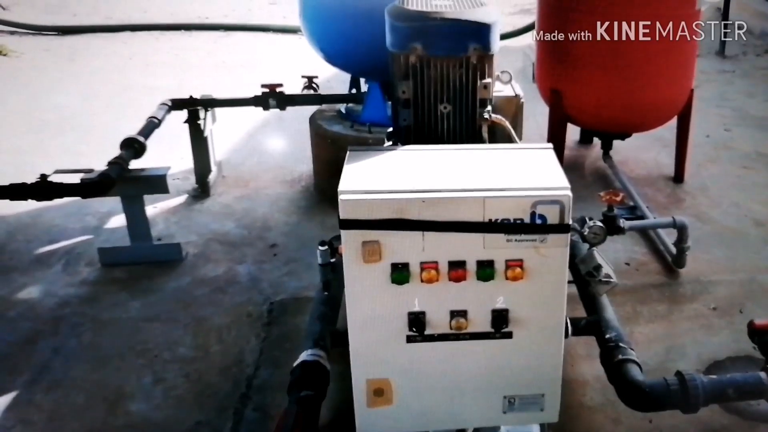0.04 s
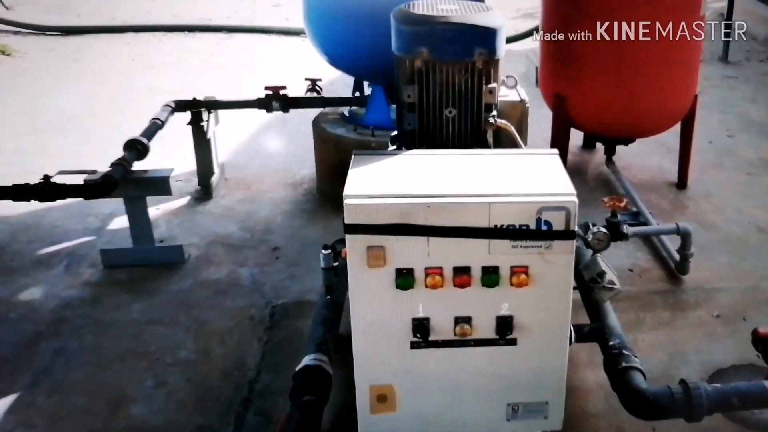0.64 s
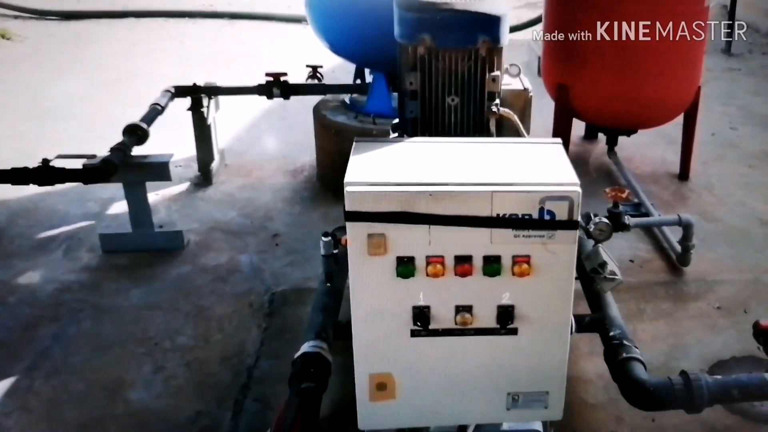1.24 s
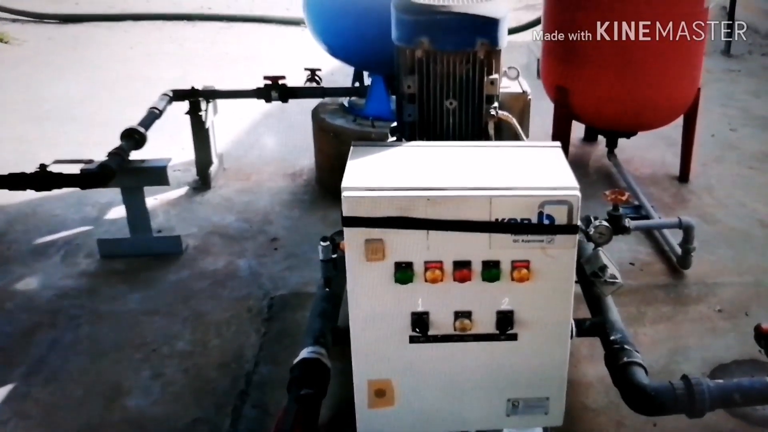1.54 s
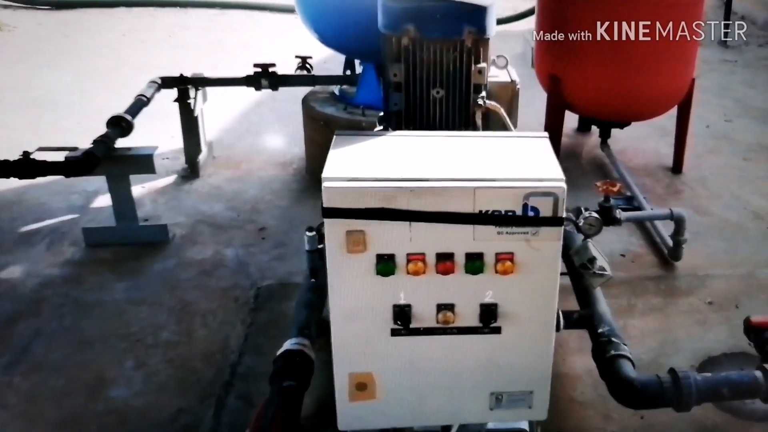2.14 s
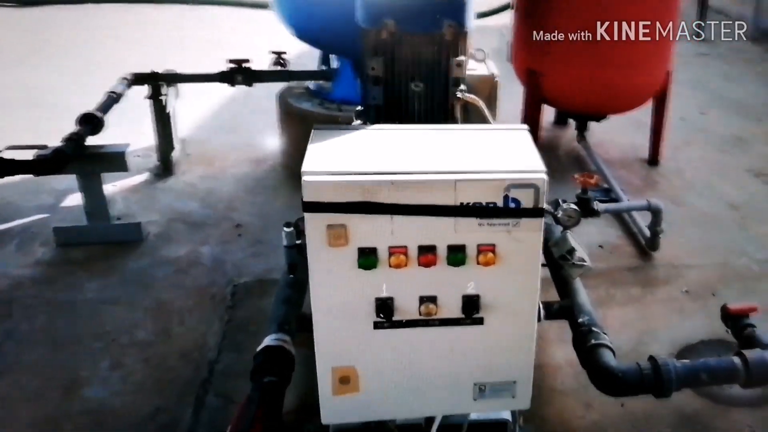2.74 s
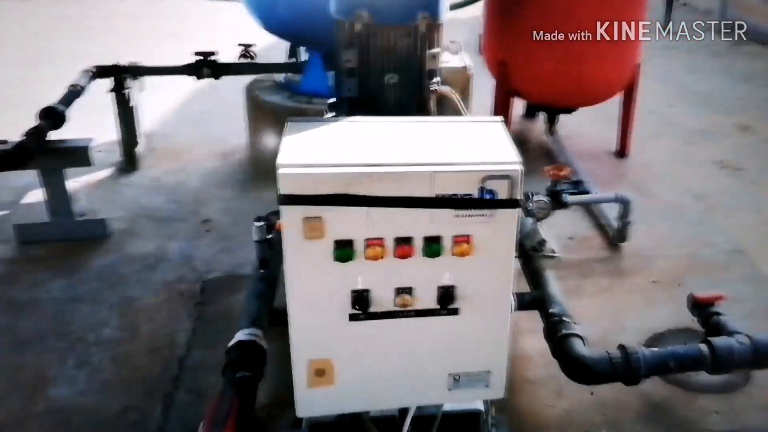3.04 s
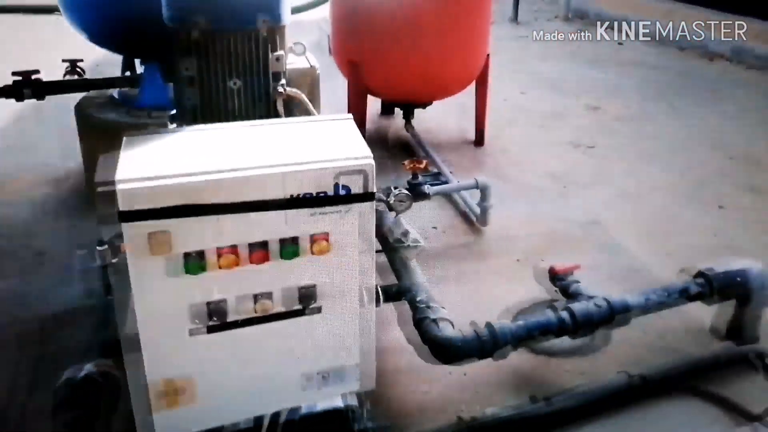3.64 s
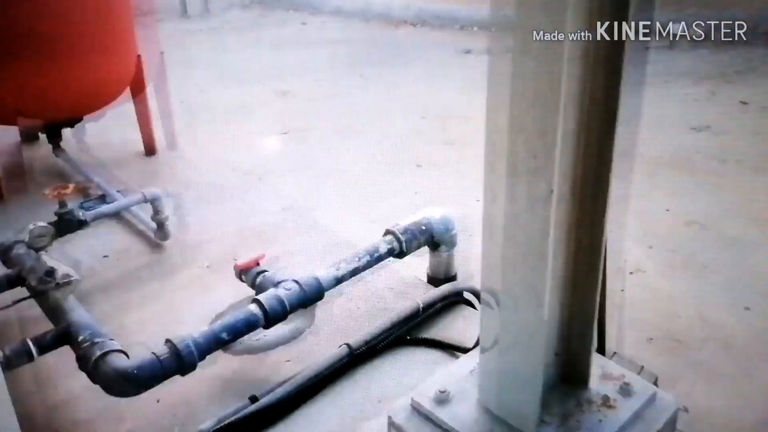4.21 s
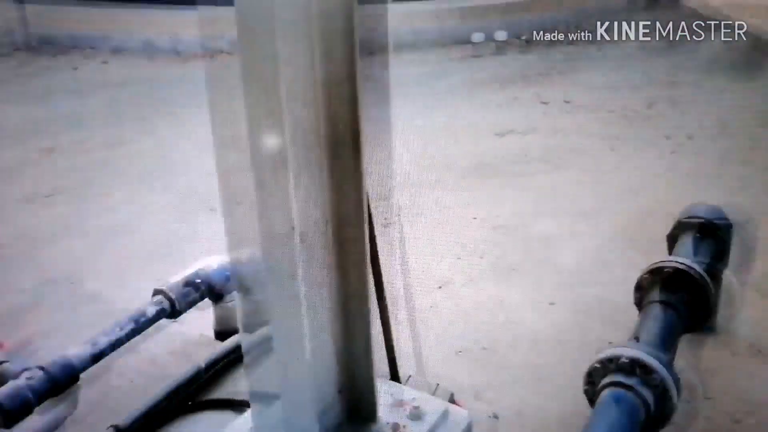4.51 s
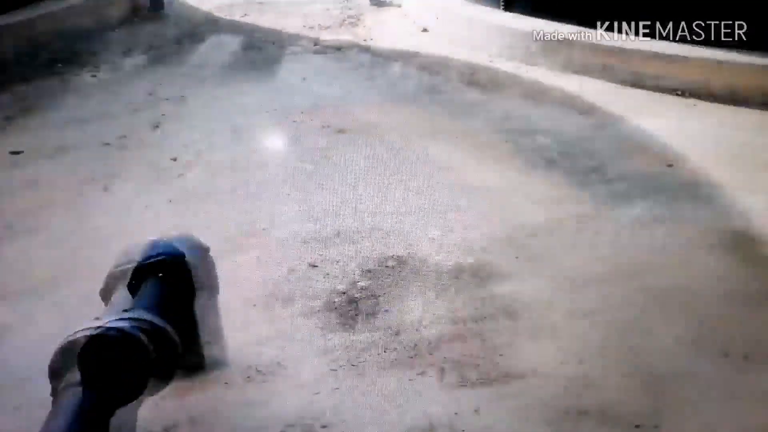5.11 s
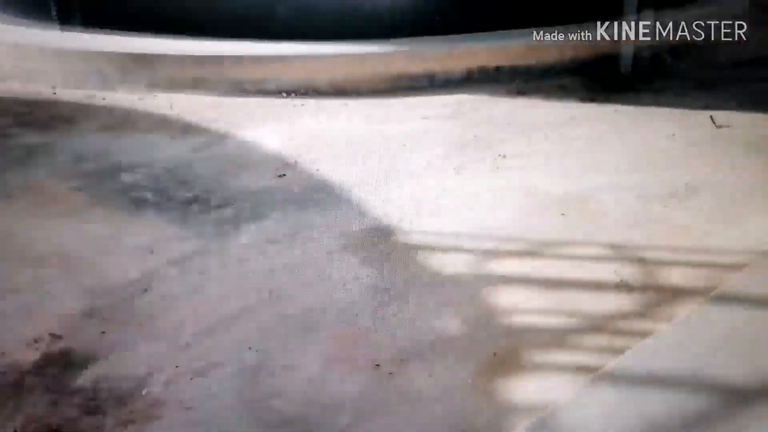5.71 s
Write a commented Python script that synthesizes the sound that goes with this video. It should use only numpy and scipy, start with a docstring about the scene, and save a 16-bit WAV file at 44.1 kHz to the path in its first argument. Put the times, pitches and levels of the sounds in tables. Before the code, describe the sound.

In a concrete pump room, an electric water pump runs steadily with a high, hissing whine. Beneath it are the airy rush of its cooling fan, faint tones, a low hum and rumbling pipes. A second pump's faint hum slowly rises as it spins up, and a few soft, dull knocks occur. The hand-held stereo microphone sways and turns away near the end, slightly softening the sound.

```python
"""In a concrete pump room, one electric water pump runs steadily while a second slowly spins up.
The drive's random switching forces the motor frame into resonance: a high, hissing whine. Under it are
the turbulent rush of the cooling fan, faint impeller tones, mains hum, rumbling pipes and a few dull
knocks. The hand-held stereo microphone sways a little and turns away at the end."""
import sys
import numpy as np
from scipy import signal
from scipy.fft import rfft, irfft
from scipy.io import wavfile
from scipy.ndimage import map_coordinates

SR = 44100
rng = np.random.default_rng(int(sys.argv[2]) if len(sys.argv) > 2 else 0)


def wrap_up_sound(samples):
    """Save the sound to the file named by the first command line argument, as 16-bit audio."""
    columns = np.atleast_2d(samples).T
    # keep every value between -1 and 1, then stretch to whole-number steps
    tamed = np.clip(columns, -1, 1)
    steps = np.round(tamed * 32767).astype(np.int16)
    wavfile.write(sys.argv[1], SR, steps)


N = 254060
TIME, FREQ = np.arange(N) / SR, np.maximum(np.arange(N // 2 + 1) * SR / N, 1)


def undb(db):
    """Amplitude ratio of a level in decibels."""
    return 10 ** (np.asarray(db) / 20)


def swing(db):
    """Amplitude modulation by a level curve taken about its mean."""
    return undb(db - db.mean())


def pan(db):
    """Port gains for a level difference, left minus right."""
    return undb(np.array([[.5], [-.5]]) * db)


def envelope(table):
    """Spectral envelope: a gain curve for each level column, with a steep roll-off past both ends."""
    hz, *columns = np.transpose(table)
    roll_off = np.minimum(1, np.minimum(FREQ / hz[0], hz[-1] / FREQ)) ** 12
    return roll_off * np.array([undb(np.interp(np.log(FREQ), np.log(hz), db)) for db in columns])


def noise(channels=1):
    """White noise of unit power per Hz."""
    return rng.standard_normal((channels, N)) * np.sqrt(SR / 2)


def walk(rate, size=8192):
    """Low-pass Gaussian fluctuation of unit variance, with a bandwidth of about rate Hz."""
    hz = np.arange(size // 2 + 1) * SR / N
    drift = irfft(rfft(rng.standard_normal(size)) * np.exp(-(hz / rate) ** 2))
    return np.interp(np.arange(N) * size / N, np.arange(size), drift / drift.std())


def tones(hz, orders, waver_db, waver_rate):
    """Harmonic series on a fundamental, each partial wavering in level independently."""
    phase = 2 * np.pi * np.cumsum(hz) / SR
    return sum(np.sqrt(2) * undb(db + waver_db * walk(waver_rate))
               * np.sin(k * phase + 2 * np.pi * rng.random()) for k, db in orders)


def resonances(peaks, force, swell_db, swell_rate, lags_ms):
    """Superposition: the stereo spectrum of narrow ringing peaks, each driven by its own noise."""
    spectrum = 0
    for hz, width, left_db, right_db in peaks:
        response = 1 / (1 + 2j * (FREQ - hz) / width) ** 2
        lag_s = rng.uniform(*lags_ms) / 1000  # each peak arrives from its own direction
        ports = undb([[left_db], [right_db]]) * np.exp(-2j * np.pi * hz * np.array([[0], [lag_s]]))
        excitation = noise() * force * swing(swell_db * walk(swell_rate))
        spectrum = spectrum + ports * response * rfft(excitation)
    return spectrum


def room(spectrum, wet=0.58, t60=0.35, lag_ms=0.028, drift_rate=0.5):
    """Direct sound plus a diffuse field, whose interference pattern shifts as the hand moves."""
    echoes = rng.standard_normal((2, 2, N)) * np.exp(-np.log(1000) * TIME / t60)
    echoes /= np.sqrt(np.sum(echoes ** 2, axis=-1, keepdims=True))
    here, there = irfft(spectrum * rfft(echoes), N)
    place = walk(drift_rate)
    diffuse = rfft(np.cos(place) * here + np.sin(place) * there)
    direct = spectrum * np.exp(-2j * np.pi * FREQ * np.array([[0], [lag_ms / 1000]]))
    return np.sqrt(1 - wet) * direct + np.sqrt(wet) * diffuse


def turned(start_s, length_s):
    """Raised-cosine progress of the microphone's turn: 0 facing the pump, 1 facing away."""
    progress = np.clip((TIME - start_s) / length_s, 0, 1)
    return .5 - .5 * np.cos(np.pi * progress)


def pickup(away_db, sway_db, sway_rate=8.3):
    """Directivity: a source's gain sways at random and falls as the microphone turns away."""
    return swing(away_db * turned(start_s=3.3, length_s=1.8) + sway_db * walk(sway_rate))


def shifted(ports, lag_ms, pan_db=0):
    """Path difference and shadowing: in mid-turn the left port lags and the balance moves by pan_db."""
    shift = turned(start_s=3.5, length_s=1.3)
    left = map_coordinates(ports[0], [(TIME - shift * lag_ms / 1000) * SR], mode="mirror")
    return np.array([left, ports[1]]) * pan(pan_db * (shift - shift.mean()))


# Broad response of the motor frame: f/Hz, left spectrum level/dB, right spectrum level/dB
FRAME_SPECTRUM = [(3300, -100, -100), (3840, -89, -80.5), (4330, -78.5, -74.5), (4620, -90, -74.5),
                  (5000, -79, -64), (5350, -78.5, -69.5), (5700, -77, -69), (6020, -75, -66),
                  (6240, -66, -60.0), (6730, -70, -64), (7200, -73, -68), (7560, -70.5, -71.5),
                  (8200, -66, -77), (8500, -61.5, -75), (8900, -76, -71.5), (9370, -70, -75),
                  (10200, -74.5, -86.5), (11340, -79, -79), (12270, -86, -81), (12700, -94, -96),
                  (13900, -101, -100), (15400, -100, -90.5)]
# Narrow ringing peaks in the high whine: f/Hz, bandwidth/Hz, left level/dB, right level/dB
WHINE_PEAKS = [(4983, 8, -90.0, -63.5), (5133, 8, -82.0, -62.0), (5278, 22, -77.5, -62.5),
               (5528, 25, -81.5, -63.0), (5683, 70, -81.5, -60.5), (5765, 44, -79.5, -59.0),
               (5839, 70, -72.5, -54.5), (5925, 51, -84.0, -55.0), (6008, 46, -72.5, -49.0),
               (6044, 29, -64.5, -62.0), (6099, 18, -74.0, -52.5), (6136, 70, -82.0, -54.5),
               (6173, 22, -63.5, -48.5), (6244, 33, -70.0, -48.0), (6272, 33, -67.0, -48.5),
               (6336, 65, -63.0, -45.5), (6401, 16, -66.5, -50.5), (6431, 29, -61.5, -48.0),
               (6461, 15, -65.5, -47.0), (6503, 31, -74.0, -45.0), (6536, 27, -58.0, -51.5),
               (6578, 35, -68.5, -49.0), (6644, 21, -71.0, -49.5), (6723, 12, -71.5, -48.5),
               (6757, 60, -68.0, -56.0), (6818, 26, -77.0, -55.0), (6875, 15, -73.5, -55.0),
               (6935, 61, -65.0, -60.0), (7020, 23, -75.5, -56.0), (7159, 70, -72.0, -63.5),
               (7238, 38, -69.0, -65.5), (7353, 22, -68.0, -67.5), (7884, 22, -59.5, -71.5),
               (8019, 23, -60.5, -84.0), (8101, 70, -61.5, -79.0), (8209, 40, -63.5, -72.5),
               (8283, 46, -58.5, -69.0), (8349, 70, -59.0, -69.5), (8421, 42, -57.0, -67.0),
               (8455, 25, -61.0, -70.5), (8511, 62, -55.5, -68.0), (8563, 30, -59.0, -66.0),
               (8636, 48, -54.0, -68.5), (8717, 26, -53.5, -72.0), (8767, 35, -54.5, -70.5),
               (8861, 64, -59.5, -72.5), (8929, 70, -64.0, -74.5), (9003, 70, -63.5, -75.5),
               (9109, 35, -62.0, -86.0), (9186, 23, -61.5, -79.0), (9380, 17, -64.5, -73.5)]


def motor_whine(flutter_db=0.56, throb_depth=0.057, throb_hz=75, split_hz=7450):
    """Forced vibration: irregular switching shakes the frame in two broad humps; narrow peaks ring."""
    throb = 1 + throb_depth * np.sin(2 * np.pi * throb_hz * TIME)
    force = undb(flutter_db * walk(51)) * throb
    broad = envelope(FRAME_SPECTRUM) * room(rfft(noise() * force))
    spectrum = broad + resonances(WHINE_PEAKS, force, swell_db=0.5, swell_rate=2.4, lags_ms=(-.05, .15))
    # the humps radiate in different directions, so each swells on its own as the microphone moves
    low_pass = 1 / (1 + (FREQ / split_hz) ** 30)
    low_hump = irfft(spectrum * low_pass, N) * pickup(away_db=-1.5, sway_db=0.62, sway_rate=30)
    high_hump = irfft(spectrum * (1 - low_pass), N) * pickup(away_db=-0.5, sway_db=0.76)
    return low_hump + high_hump


# Broad airy rush, with a slight dip near 3.2 kHz and a lift near 3.5 kHz:
# f/Hz, left spectrum level/dB, right spectrum level/dB
RUSH_SPECTRUM = [(99, -105, -105), (298, -93, -92), (434, -88.5, -88), (567, -84, -83.5),
                 (708, -80.5, -81.5), (870, -79.5, -72.5), (1090, -73, -75.5), (1200, -88, -77.5),
                 (1480, -82.5, -77.5), (1910, -78, -77.5), (2500, -80.5, -77.5), (2800, -83, -79.5),
                 (3200, -84.5, -83.5), (3550, -80.5, -80), (3950, -95, -89.5), (5150, -105, -105)]
# Modes of the fan cowl: f/Hz, bandwidth/Hz, left relative level/dB, right relative level/dB
COWL_MODES = [(535, 36, -84.0, -82.5), (670, 29, -81.5, -80.0), (792, 17, -76.5, -78.0),
              (831, 37, -73.0, -74.5), (858, 19, -72.0, -73.0), (886, 9, -73.5, -70.5),
              (913, 33, -70.0, -69.0), (937, 16, -71.5, -73.0), (1072, 58, -73.0, -68.5),
              (1104, 23, -75.0, -69.5), (1119, 15, -69.0, -68.0), (1171, 8, -77.0, -70.5),
              (1365, 13, -76.0, -70.5), (1394, 40, -85.0, -72.0), (1446, 61, -77.0, -73.5),
              (1559, 31, -75.5, -75.0), (1645, 14, -74.0, -68.5), (1684, 39, -78.5, -78.0),
              (1772, 42, -76.5, -75.0), (1912, 39, -81.5, -73.0), (1999, 52, -78.0, -74.5),
              (2269, 32, -84.0, -74.0), (2421, 24, -88.0, -74.0), (2538, 43, -79.5, -81.0)]


def cooling_fan(coherent_below_hz=1100, flutter_db=1.0, cowl_db=0.7):
    """Turbulence radiates broadband noise, coherent between the ports in the bass, and rings the cowl."""
    force = undb(flutter_db * walk(24))
    coherence = 1 / (1 + (FREQ / coherent_below_hz) ** 4)
    air = np.sqrt(coherence) * rfft(noise()) + np.sqrt(1 - coherence) * rfft(noise(channels=2))
    rush = irfft(air * envelope(RUSH_SPECTRUM), N) * force
    modes = resonances(COWL_MODES, force, swell_db=0.8, swell_rate=0.73, lags_ms=(-.08, .02))
    cowl = undb(cowl_db) * irfft(modes, N)
    return (shifted(rush, lag_ms=0.13) * pickup(away_db=-1.5, sway_db=0.8)
            + shifted(cowl, lag_ms=0.27, pan_db=-9) * pickup(away_db=-1.8, sway_db=-0.15))


# Tones of the running pump, whose six vanes give the multiples of 6: shaft order, level/dB
IMPELLER_ORDERS = [(3, -78), (18, -60), (36, -68)]
# Tone at twice the vane-passing rate: shaft order, level/dB before it swells
SWELLING_ORDERS = [(12, -70)]


def impeller(shaft_hz=59.45, swell_s=4.35, swell_width_s=0.25, swell_db=8):
    """Periodic forcing gives harmonics of the shaft rate; one swells briefly during the turn."""
    hz = shaft_hz * (1 + 0.00048 * walk(5.4))
    swell = undb(swell_db * np.exp(-((TIME - swell_s) / swell_width_s) ** 2))
    steady = tones(hz, IMPELLER_ORDERS, waver_db=2.0, waver_rate=4.6)
    swelling = swell * tones(hz, SWELLING_ORDERS, waver_db=2.0, waver_rate=4.6)
    return (steady + swelling) * pickup(away_db=-2.5, sway_db=1.5) * pan(1)


def hum(mains_hz=60, magnetic_db=-64, deep_hz=57.9, deep_db=-64.5):
    """Magnetic force pulses at twice the mains frequency; a steady deep tone lies below it."""
    magnetic = tones(np.full(N, mains_hz), [(2, magnetic_db)], waver_db=1.0, waver_rate=12)
    deep = tones(np.full(N, deep_hz), [(1, deep_db)], waver_db=0.5, waver_rate=2)
    return (magnetic + deep) * pan(-3)


# Tones of the second pump's shaft: shaft order, level/dB at full speed
UNBALANCE_ORDERS = [(1, -54.5), (2, -63)]


def second_pump(start_hz=27.6, full_hz=55, time_constant_s=1.5, growth=0.82):
    """Rotating unbalance hums higher and louder with speed, beating ever slower against the deep hum."""
    hz = full_hz - (full_hz - start_hz) * np.exp(-TIME / time_constant_s)
    speed = hz / full_hz
    partials = (tones(hz, [(k, db)], waver_db=0.7, waver_rate=4.4) * speed ** (growth * k ** 2)
                for k, db in UNBALANCE_ORDERS)
    return sum(partials) * pan(-4)


# Rumble of the pipework and base: f/Hz, spectrum level/dB
PIPE_SPECTRUM = [(8, -90), (18, -85), (40, -84.5), (70, -85.5), (90, -85), (115, -77.5), (150, -83.5),
                 (210, -88), (400, -95), (900, -115)]


def pipework(incoherent_db=-10, surge_db=1.2):
    """Flow noise: water in the pipes makes a low, uneven rumble, nearly the same at both ports."""
    flow = noise() + undb(incoherent_db) * noise(channels=2)
    rumble = irfft(rfft(flow) * envelope(PIPE_SPECTRUM), N)
    return rumble * undb(surge_db * walk(7.0)) * pan(-1)


# Soft, dull knocks: t/s, peak level/dB
KNOCK_EVENTS = [(0.94, -49), (1.85, -43), (1.89, -50), (3.34, -50), (3.585, -50), (4.985, -50)]


def knock(start_s, peak_db, hz=300, width_hz=520, t60=0.13):
    """Transient response: a decaying noise burst through a heavily damped resonance gives a thud."""
    age = np.maximum(TIME - start_s, 0)
    burst = noise() * (age > 0) * np.exp(-np.log(1000) * age / t60)
    response = 1 / (1 + 1j * (FREQ ** 2 - hz ** 2) / (FREQ * width_hz)) ** 2
    thud = irfft(rfft(burst) * response, N)
    return undb(peak_db) * thud / np.abs(thud).max()


def scene():
    """Linear superposition of both pumps, their pipework and the knocks."""
    knocks = sum(knock(start_s, peak_db) for start_s, peak_db in KNOCK_EVENTS)
    return motor_whine() + cooling_fan() + impeller() + hum() + second_pump() + pipework() + knocks


def record(dry, cutoff_hz=15250):
    """Band limiting: a steep elliptic low-pass removes the highest treble."""
    return signal.sosfilt(signal.ellip(10, .1, 80, cutoff_hz, fs=SR, output="sos"), dry)


dry = scene()
out = record(dry)
wrap_up_sound(out)
```